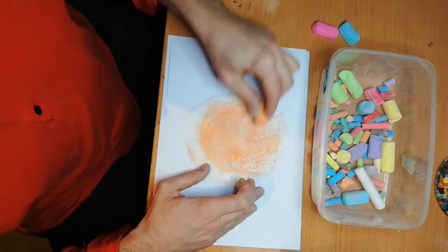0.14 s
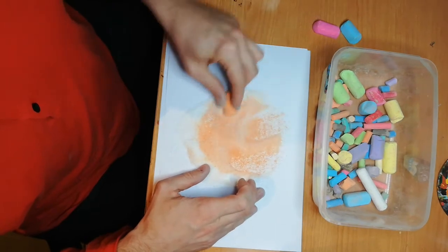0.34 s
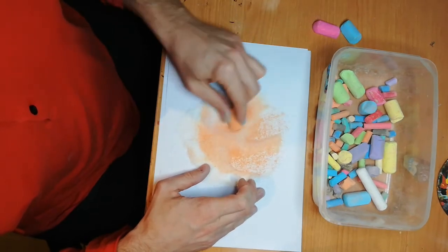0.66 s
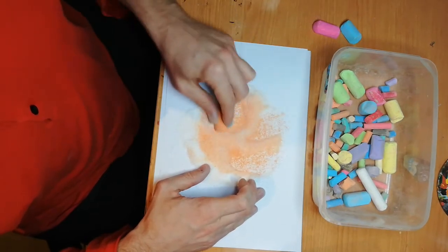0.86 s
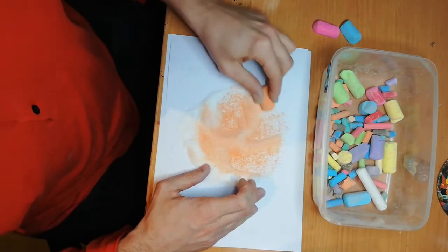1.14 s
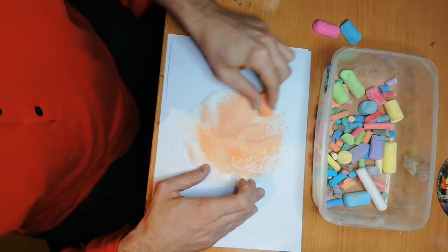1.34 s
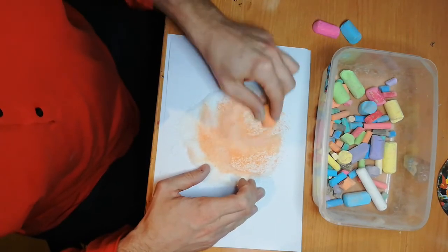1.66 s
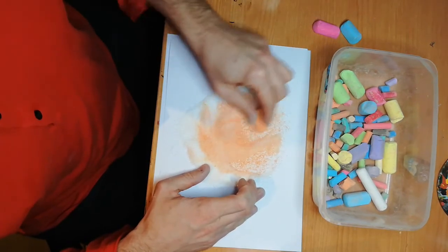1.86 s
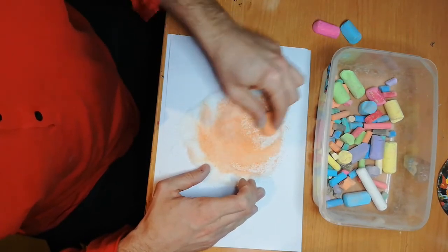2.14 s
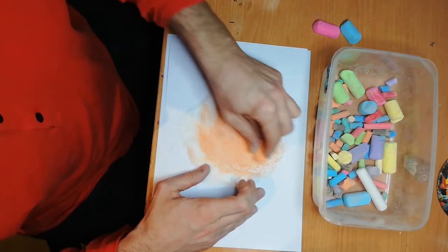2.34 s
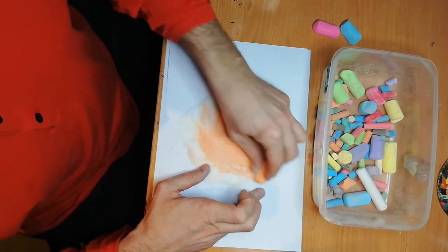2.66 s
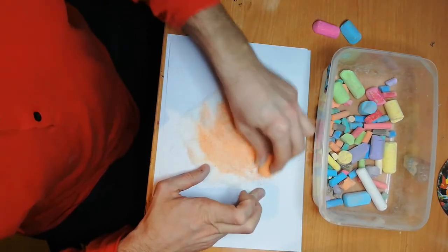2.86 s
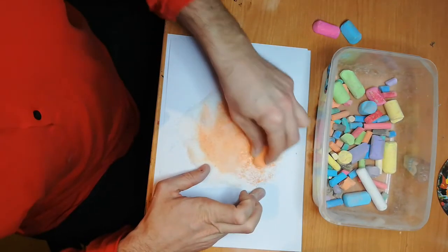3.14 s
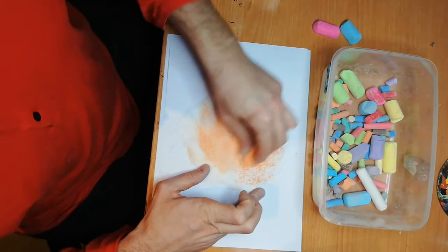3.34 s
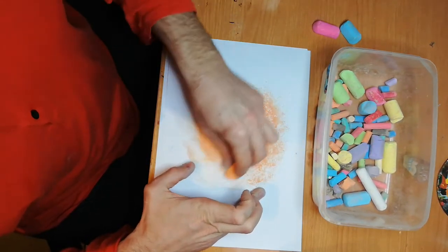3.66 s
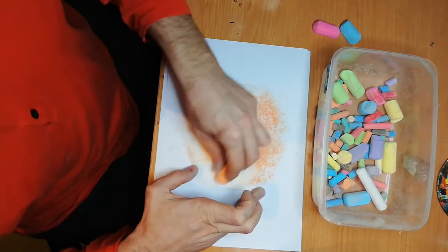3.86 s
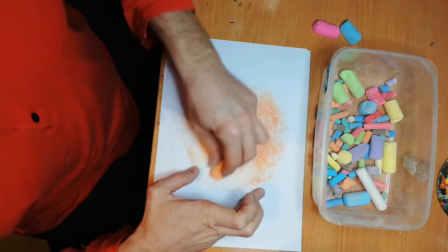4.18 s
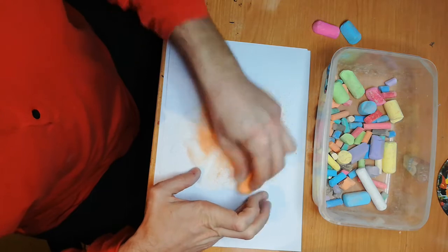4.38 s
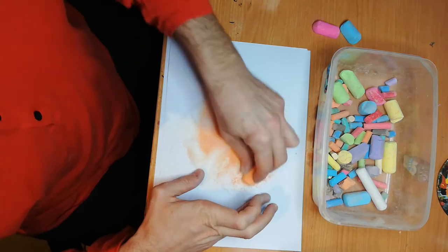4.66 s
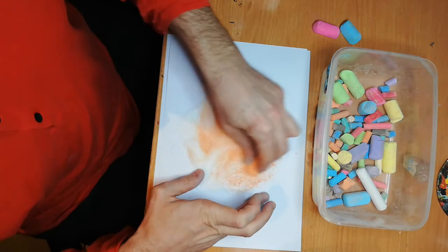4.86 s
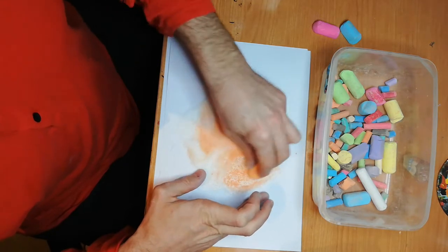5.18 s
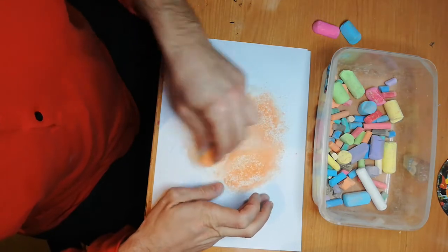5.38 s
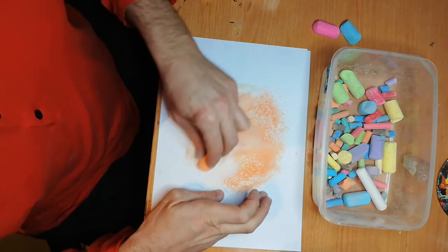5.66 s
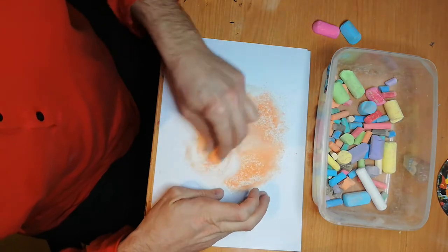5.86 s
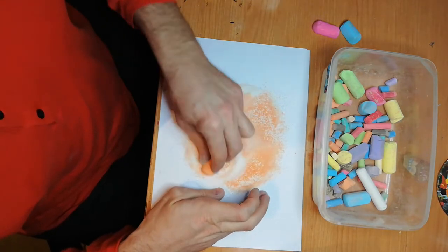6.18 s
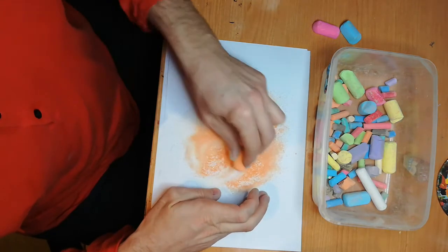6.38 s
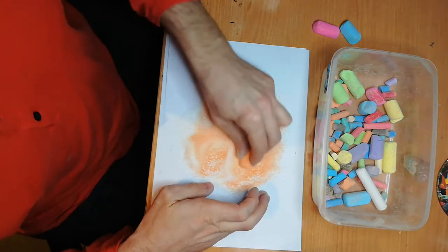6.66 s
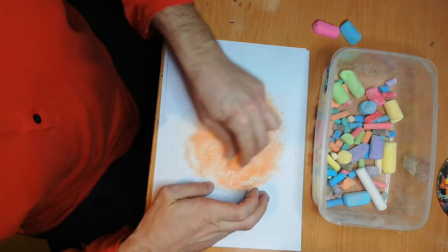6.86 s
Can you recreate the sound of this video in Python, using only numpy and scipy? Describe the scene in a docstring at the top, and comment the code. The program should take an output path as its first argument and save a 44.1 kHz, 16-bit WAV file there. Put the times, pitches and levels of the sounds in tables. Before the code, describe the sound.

A chalk stub grinds in quick, gritty strokes through salt on paper, rasping brightly while the wooden table beneath hums dully, in a small quiet room.

```python
"""Quick grinding strokes of a chalk stub in a mound of salt on paper, lifted and set down again now and then.
Noise bursts at chance moments make the crystals that crack and skid; the drag rings modes of a wooden table.
A small room answers briefly, over quiet room tone. The two microphone ports of a camera above hear the
table top out of step, and the left port has a bright cavity peak."""
import sys
import numpy as np
from scipy import signal
from scipy.fft import rfft, irfft
from scipy.io import wavfile
from scipy.ndimage import uniform_filter1d

SR = 44100
rng = np.random.default_rng(int(sys.argv[2]) if len(sys.argv) > 2 else 0)


def gain_from_db(level_db):
    """Convert decibel levels to linear amplitude factors (20 dB per decade)."""
    decades = np.asarray(level_db, float) / 20
    return 10 ** decades


def wav_record(signal):
    """Record a signal, one row per channel, as 16-bit PCM in the file named by sys.argv[1]."""
    frames = np.transpose(np.atleast_2d(signal))
    bounded = np.clip(frames, -1, 1)
    # unit amplitude maps onto the largest positive 16-bit level
    quanta = np.round(bounded * 32767).astype(np.int16)
    wavfile.write(sys.argv[1], SR, quanta)


N = 309141  # length in samples

# All levels are relative: filters and gains in the functions set the final balance.
# strokes, each swelling with the speed of the hand:
# fastest_s, crunch_db, fall_s (time to fall 6 dB), drag_db (over the crunch)
STROKES = [(0.038, -28.0, 0.045, -8.5), (0.307, -31.0, 0.027, -6.0), (0.389, -32.5, 0.046, -5.5),
           (0.472, -33.0, 0.034, -4.0), (0.61, -33.5, 0.086, -6.5), (0.715, -31.5, 0.031, -6.5),
           (0.833, -33.5, 0.077, -6.5), (0.949, -35.5, 0.021, -9.5), (1.18, -34.0, 0.017, -7.0),
           (1.261, -30.0, 0.048, -7.0), (1.372, -30.5, 0.033, -7.0), (1.491, -30.5, 0.063, -6.5),
           (1.632, -31.5, 0.039, -6.5), (1.753, -31.5, 0.053, -4.0), (1.894, -30.5, 0.038, -4.5),
           (2.009, -32.0, 0.055, -6.0), (2.13, -36.5, 0.037, -8.0), (2.281, -32.0, 0.026, -11.5),
           (2.345, -32.5, 0.059, -5.5), (2.47, -39.5, 0.026, -4.0), (2.629, -32.0, 0.035, -5.0),
           (2.743, -32.0, 0.066, -5.5), (2.86, -40.0, 0.032, -1.5), (2.951, -35.5, 0.037, -8.0),
           (3.033, -34.0, 0.052, -5.0), (3.117, -36.0, 0.058, -3.0), (3.265, -34.0, 0.05, -8.5),
           (3.365, -35.0, 0.043, -1.5), (3.598, -34.0, 0.019, -5.0), (3.681, -30.5, 0.036, -7.0),
           (3.834, -36.5, 0.018, -9.5), (3.916, -32.0, 0.053, -3.0), (4.132, -35.5, 0.015, -9.0),
           (4.233, -29.5, 0.049, -6.0), (4.46, -28.0, 0.016, -6.0), (4.526, -31.5, 0.038, -7.0),
           (4.618, -35.5, 0.09, -4.0), (4.773, -33.5, 0.059, -7.0), (4.886, -31.0, 0.043, -4.5),
           (5.004, -30.5, 0.035, -3.5), (5.116, -32.0, 0.042, -4.0), (5.22, -40.5, 0.013, -2.0),
           (5.273, -42.5, 0.07, -19.0), (5.498, -38.5, 0.012, -12.0), (5.558, -33.0, 0.054, -5.5),
           (5.695, -35.5, 0.044, -8.0), (5.806, -34.5, 0.07, -5.0), (5.935, -33.0, 0.045, -7.5),
           (6.04, -32.0, 0.048, -6.5), (6.169, -33.5, 0.046, -4.0), (6.273, -34.0, 0.036, -4.5),
           (6.501, -33.0, 0.012, -5.0), (6.59, -36.0, 0.065, -3.5), (6.763, -32.5, 0.048, -5.5),
           (6.879, -33.5, 0.055, -3.0), (7.03, -32.0, 0.04, -5.0)]
# landings of the chalk; loose salt trickles after the last stroke of each contact:
# start_s, thump_db, trickle_db, trickle_fade_db_per_s
CONTACTS = [(0, -70, -43, 103), (.284, -37, -50, 127), (1.165, -57, -46, 153), (2.255, -51, -40, 211),
            (2.625, -29, -36, 185), (3.598, -25, -42, 74), (3.834, -32, -45, 131), (3.885, -50, -38, 179),
            (4.122, -34, -56, 5), (4.455, -22, -70, 5), (5.484, -51, -49, 5), (6.491, -30, -42, 5)]
# single crystals that snap loudest: start_s, level_db
SNAPS = [(0.0283, -21), (0.7178, -23), (1.2135, -22), (2.2877, -22), (2.3681, -14), (2.6294, -19),
         (2.6367, -17), (2.661, -20), (4.39, -46), (4.5172, -17), (6.2534, -26), (6.366, -41), (6.387, -38),
         (6.446, -40)]
# how hard the hand leans on the table: time_s, weight_db
LEAN = [(0, -24.5), (.55, -21.5), (1, -21), (1.9, -21), (2.35, -25.5), (3.1, -21), (4, -25), (4.75, -20),
        (5.5, -26), (6, -17.5), (6.25, -19), (6.5, -25), (7, -23)]
# bright scratch of chalk on paper, muffled where the salt is thick: time_s, scratch_db
SCRATCH = [(0, 1), (1.1, 1), (1.8, -2), (2.9, -.5), (3.8, 2), (4.9, -1.5), (5.8, 2), (7, 0)]
# airborne rasp of paper and salt at each port: pitch_hz, level_db (per Hz)
RASP_LEFT = [(300, -18), (1000, -6.5), (2000, -17), (3300, -17), (4700, -13), (7000, -11), (11000, -13),
             (16000, -26.5)]
RASP_RIGHT = [(300, -13), (1000, -5.5), (2000, -11), (3300, -12), (4700, -12.5), (8800, -13.5),
              (11500, -21.5), (16000, -23.5)]
# cavity peak of the left port: pitch_hz, width_hz, level_db
CAVITY = (9040, 986, 16.5)
# modes of the table top: pitch_hz, width_hz (per pass of two), left_db, right_db, left_lead_rad
TOP_MODES = [(560, 60, -4, -3, 3.1), (612, 36, -4, -5, 2.2), (690, 40, -6, -1, -2.9),
             (768, 40, -1, 0, -2.4), (830, 50, -5, -2, -2.8), (885, 36, -9, -6, -.5),
             (946, 36, -14, -4, 1.2), (1040, 55, -3, -12, 2.5), (1278, 55, -12, -9, .9),
             (1372, 80, -14, -9, -.1), (1532, 45, -12, -8, .6), (1640, 65, -10, -13, 0)]
# modes of the whole table on its legs: pitch_hz, width_hz, level_db
FRAME_MODES = [(62.6, 6, -12), (76, 14, -8), (117, 12.6, -4), (135.8, 22.6, -4.5), (250, 28.7, -7.5),
               (315, 53, -7.5)]
# faint thin whistle in the first pause: pitch_hz, width_hz (per pass of two), level_db
WHISTLE = [(4100, 500, -40), (5800, 60, -33)]
# room tone: pitch_hz, level_db (per Hz)
AIR = [(24, -39), (40, 3), (194, 4), (337, -11), (2050, -12), (4340, -6), (16000, -45)]

LAND_S = 0.004  # the sound is full this long after a landing
DRAG_LAG_S = 0.006  # the drag peaks this long after the hand
EASE_DB, EASE_DB_PER_S = -8, 230  # drag left as the chalk lifts, below the last stroke, and its fade
SNAP_S = 0.0012  # fade of each snap to 1/e
SCRATCH_HZ, PAPER_TOP_HZ = 1700, 4720  # the scratch lies between these
KEEN_S, KEEN_SPAN_S, KEEN_DB = 2.4, 0.3, 3.5  # the cavity peak stands out most around this moment
WHISTLE_S, WHISTLE_FALL_S = 0.19, 0.04  # middle, and time to fall 6 dB
ROOM_T60_S, ROOM_DB = 0.2, -12.5
AIR_DB = -63.5  # rms
TOP_HZ = 15900  # upper edge of the microphone band


def set_rms(x, db):
    """Scale a signal to an rms level in dB."""
    return x * gain_from_db(db) / np.sqrt(np.mean(x ** 2))


def band(x, hz, kind, order=4):
    """Butterworth filter."""
    return signal.sosfilt(signal.butter(order, hz, kind, fs=SR, output="sos"), x)


def colour(x, points):
    """Filter by (Hz, dB) points with a causal response made from the cepstrum of the gain."""
    hz, db = np.transpose(points)
    grid_hz = np.arange(1025) * SR / 2048 + 1
    gain = gain_from_db(np.interp(np.log(grid_hz), np.log(hz), db))
    cepstrum = irfft(np.log(gain))
    # folding the second half onto the first makes the response causal
    cepstrum[1:1024] *= 2
    cepstrum[1025:] = 0
    response = irfft(np.exp(rfft(cepstrum)))
    return signal.fftconvolve(x, response)[:N]


def ring(x, hz, width):
    """One mode as a turning, fading arrow; gain 1 at its centre."""
    pole = np.exp((2j * hz - width) * np.pi / SR)
    return signal.lfilter([1 - abs(pole)], [1, -pole], x)


def walk(rate):
    """Random levels held 1 / rate s and slewed twice; spread near 1."""
    hold = int(SR / rate)
    steps = rng.standard_normal(N)[np.arange(N) // hold]
    return uniform_filter1d(uniform_filter1d(steps, hold), hold) * np.sqrt(2)


def grains(per_s, spread_db, hiss_db, burst_s, count=1):
    """Crystals that crack at chance moments, many small and few large, over the hiss of fine powder."""
    chance, size = rng.random((2, N))
    # the small offset limits the largest crystals
    power = (chance < per_s / SR) * gain_from_db(-2 * spread_db * np.log(size + 0.00084))
    power = signal.lfilter([1], [1, -np.exp(-1 / (burst_s * SR))], power)
    envelope = np.sqrt(power / power.mean() + gain_from_db(2 * hiss_db))
    return set_rms(envelope * rng.standard_normal((count, N)), 0)


def clicks(rows):
    """A single push at each (s, dB)."""
    s, db = np.transpose(rows)
    out = np.zeros(N)
    out[(s * SR).astype(int)] = gain_from_db(db)
    return out


def hand(now):
    """Power of crunch, drag and trickle: the strokes of each contact add up, then the drag eases off."""
    crunch, drag, trickle = np.full((3, N), 1e-12)
    s, db, fall_s, drag_db = np.transpose(STROKES)[:, :, None]
    lands = np.r_[np.array(CONTACTS)[:, 0], now[-1] + 1]
    for (land, _, trickle_db, fade), leave in zip(CONTACTS, lands[1:]):
        on = (now >= land) & (now < leave)
        t = now[on]
        mine = np.flatnonzero((s > land - 0.01) & (s <= leave - 0.01))  # strokes of this contact

        def swell(lag, peak_db):
            fall_db = 6 * ((t - lag - s[mine]) / fall_s[mine]) ** 2
            return gain_from_db(2 * (peak_db[mine] - fall_db)).sum(0)

        rise = np.clip((t - land) / LAND_S, 0, 1) ** 2
        last = mine[-1]
        after = np.maximum(t - s[last], 0)  # time since the last stroke peaked
        crunch[on] += rise * swell(0, db)
        trickle[on] += (after > 0) * gain_from_db(2 * (trickle_db - abs(fade) * after))
        ease_db = db[last] + drag_db[last] + EASE_DB - EASE_DB_PER_S * after
        drag[on] += rise * swell(DRAG_LAG_S, db + drag_db) + (after > 0) * gain_from_db(2 * ease_db)
    return crunch, drag, trickle


def rasp(now, crunch, drag, trickle, scratch_db):
    """Skidding crystals heard through the air: cracks on top, the duller drag of the paper below."""
    cracks = crunch * gain_from_db(0.86 * walk(90)) * grains(450, 2.2, 0.5, 0.001, count=2)
    cracks = cracks + trickle * grains(120, 2.2, 2, 0.0012, count=2)  # loose crystals tick one by one

    paper = drag * grains(300, 2.0, 0, 0.003, count=2)
    dull = band(paper, SCRATCH_HZ, "low") * gain_from_db(1.0 * walk(12))
    scratch = band(paper, (SCRATCH_HZ, PAPER_TOP_HZ), "band") * gain_from_db(scratch_db + 0.8 * walk(15))

    snap_envelope = signal.lfilter([1], [1, -np.exp(-1 / (SNAP_S * SR))], clicks(SNAPS))
    snaps = band(snap_envelope * rng.standard_normal((2, N)), (6500, 11500), "band")
    skid = band(cracks, PAPER_TOP_HZ, "high") + snaps + gain_from_db(7) * (dull + scratch)

    left, right = colour(skid[0], RASP_LEFT), colour(skid[1], RASP_RIGHT)
    # finer or coarser crystals excite the port cavity more or less from moment to moment
    cavity_hz, cavity_width, cavity_db = CAVITY
    keen_db = KEEN_DB * np.exp(-((now - KEEN_S) / KEEN_SPAN_S) ** 2)
    fed = left * gain_from_db(cavity_db + keen_db + 1.0 * walk(12))
    left = left + 2 * ring(fed, cavity_hz, cavity_width).real
    return gain_from_db(11.5) * np.array([left, right])


def table_top(drag, scratch_db):
    """The drag shakes the top; each mode is fed unevenly as the chalk wanders, high ones most on thin salt."""
    pushes = gain_from_db(30.4) * drag * grains(330, 3.0, 0, 0.003, count=len(TOP_MODES))
    out = np.zeros((2, N))
    for push, (hz, width, left_db, right_db, lead) in zip(pushes, TOP_MODES):
        fed = push * gain_from_db(2.6 * walk(9) + scratch_db * (hz / SCRATCH_HZ) ** 2)
        mode = ring(ring(fed, hz, width), hz, width)  # twice: steep flanks, deep valleys
        out[0] += gain_from_db(left_db) * (mode * np.exp(1j * lead)).imag
        out[1] += gain_from_db(right_db) * mode.imag
    return band(out, 420, "high", 3)


def table_frame(weight):
    """The weight of the hand and each landing rock the whole table; both ports hear it alike."""
    thump = np.hanning(int(0.0085 * SR))
    knock = gain_from_db(9) * np.convolve(clicks(np.array(CONTACTS)[:, :2]), thump)[:N]
    push = gain_from_db(36.5) * weight * grains(60, 4.5, 8.1, 0.002)[0]
    out = np.zeros(N)
    for hz, width, db in FRAME_MODES:
        fed = push * gain_from_db(3.2 * walk(12)) + knock
        out += gain_from_db(db) * ring(fed, hz, width).imag
    return out


def whistle(now):
    """Two narrow bands of hiss that swell and fade once."""
    swell = gain_from_db(-6 * ((now - WHISTLE_S) / WHISTLE_FALL_S) ** 2)
    hiss = swell * rng.standard_normal((2, N))
    return sum(gain_from_db(db) * ring(ring(hiss, hz, width), hz, width).real for hz, width, db in WHISTLE)


def room(x):
    """Add a dense fading tail, duller than the sound, unlike at the two ports except in the bass."""
    t = np.arange(int(0.5 * SR)) / SR
    fade = gain_from_db(-60 * t / ROOM_T60_S) * (t > 0.006)  # silent until the first reflections
    mid, side = rng.standard_normal((2, len(t))) * fade
    side = band(side, 300, "high", 2)
    tail = set_rms(np.array([mid + side, mid - side]), ROOM_DB) / np.sqrt(len(t))
    dull = band(x, 3000, "low", 1)
    return x + signal.fftconvolve(dull, tail, axes=1)[:, :N]


def air():
    """Quiet room tone from coloured noise; the bass is shared by both ports."""
    mid, side = (colour(rng.standard_normal(N), AIR) for _ in range(2))
    side = band(side, 300, "high", 2)
    return set_rms(np.array([mid + side, mid - side]), AIR_DB)


def scene():
    """Chalk, salt and table sound together in the room, over its tone."""
    now = np.arange(N) / SR
    crunch, drag, trickle = np.sqrt(hand(now))
    scratch_db = np.interp(now, *np.transpose(SCRATCH))
    # the heavy hand follows the strokes only in part
    weight = drag ** 0.68 * gain_from_db(np.interp(now, *np.transpose(LEAN)))
    near = rasp(now, crunch, drag, trickle, scratch_db)
    near = near + table_top(drag, scratch_db) + table_frame(weight) + whistle(now)
    return room(near) + air()


def band_limit(x):
    """A steep low-pass at the top of the band."""
    return signal.sosfilt(signal.butter(12, 16500, fs=SR, output="sos"), x)


def record(dry):
    """The camera microphones cut the deep bass and the very top."""
    no_rumble = band(dry, 52, "high")
    top_cut = signal.ellip(8, 0.2, 70, TOP_HZ, fs=SR, output="sos")
    mix = signal.sosfilt(top_cut, no_rumble)
    return band_limit(mix)


dry = scene()
out = record(dry)
wav_record(out)
```